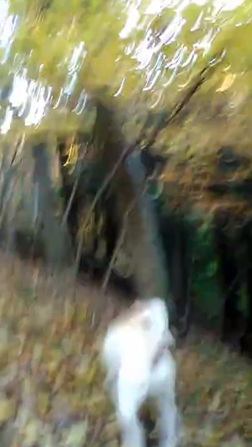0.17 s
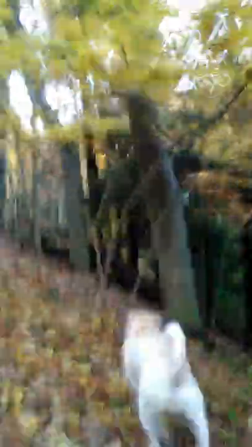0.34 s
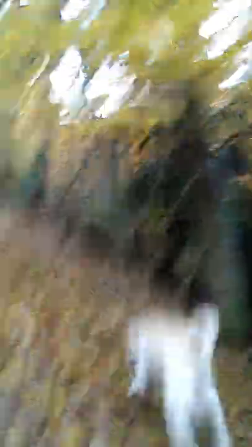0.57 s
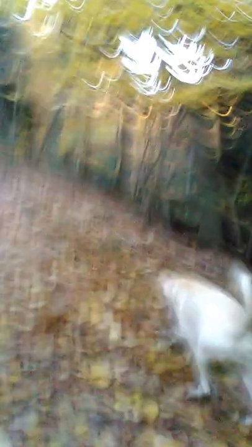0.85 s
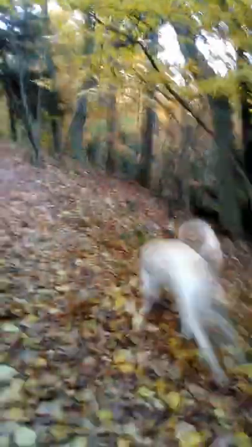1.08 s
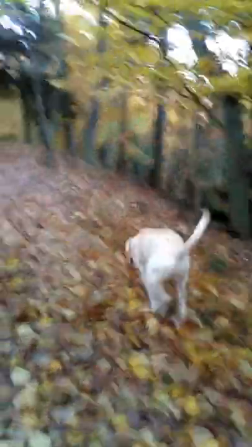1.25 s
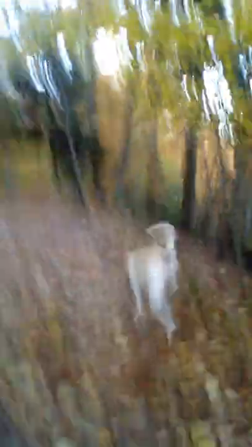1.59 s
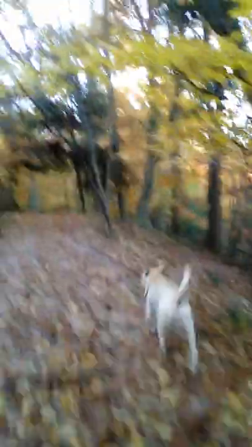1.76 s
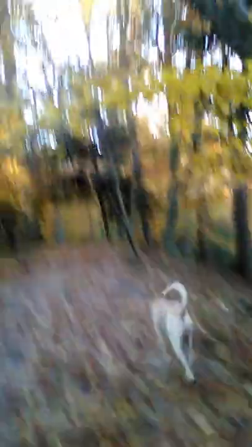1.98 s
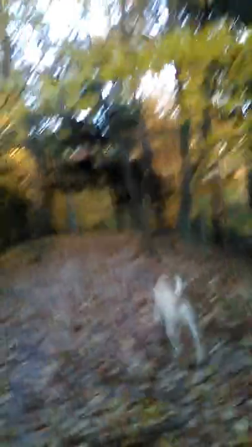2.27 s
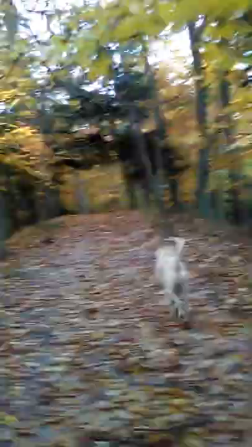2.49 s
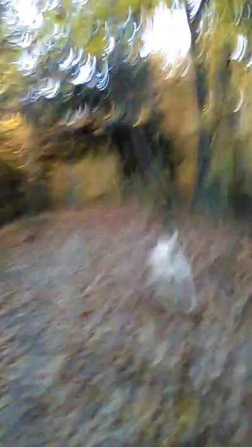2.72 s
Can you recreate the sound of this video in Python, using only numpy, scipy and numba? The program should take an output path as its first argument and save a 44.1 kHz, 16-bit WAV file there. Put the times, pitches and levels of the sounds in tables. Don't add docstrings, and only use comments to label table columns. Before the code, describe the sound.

Walking in dry leaves, crisp crackling steps, a bright twig snap, cloth rustle and handling bumps

```python
import sys
import numpy as np
from scipy import signal
from scipy.fft import rfft, irfft
from scipy.io import wavfile
from scipy.ndimage import uniform_filter1d
from numba import njit

SR = 44100
rng = np.random.default_rng(int(sys.argv[2]) if len(sys.argv) > 2 else 0)


def magnitude_from_level(level_db):
    exponent = np.asarray(level_db, float) / 20
    return 10 ** exponent


def dump_mix(stems):
    frames = np.atleast_2d(stems).T
    limited = np.clip(frames, -1, 1)
    pcm = np.round(limited * 32767).astype(np.int16)
    wavfile.write(sys.argv[1], SR, pcm)


N = 125685


@njit
def svf(x, hz, width):
    y, band_state, low_state = np.empty(len(x)), 0., 0.
    for i in range(len(x)):
        g = np.tan(np.pi * hz[i] / SR)
        damping = width[i] / hz[i]
        v = (band_state + g * (x[i] - low_state)) / (1 + g * (g + damping))
        band_state = 2 * v - band_state
        low_state = low_state + 2 * g * v
        y[i] = damping * v
    return y


def band(x, hz, width):
    return svf(x, np.ones(len(x)) * hz, np.ones(len(x)) * width)


def unit(x):
    return x / np.sqrt(np.mean(x ** 2))


def noise():
    return rng.standard_normal(N)


def walk(rate):
    hold = int(SR / rate)
    steps = np.repeat(rng.standard_normal(N // hold + 1), hold)
    return 1.1 * uniform_filter1d(uniform_filter1d(steps, hold), hold)[:N]


def colour(x, table):
    hz, db = np.array(table).T
    f = np.fft.rfftfreq(N, 1 / SR) + 1
    gain = magnitude_from_level(np.interp(np.log(f), np.log(hz), db, left=-70, right=-70))
    return unit(irfft(rfft(x) * gain, N))


def grains(rate, spread_db):
    hit, size, sign = rng.random(N), rng.exponential(size=N), rng.standard_normal(N)
    return unit((hit < rate / SR) * magnitude_from_level(spread_db * np.minimum(size, 4)) * np.sign(sign))


def swells(t, table):
    power, trait = 1e-14, 0
    for at, db, rise, fall, value in table:
        decay = np.where(t < at, ((at - t) / rise) ** 2, (t - at) / fall * 2)
        p = magnitude_from_level(2 * db) * np.exp(-np.clip(decay, 0, 20))
        power = power + p
        trait = trait + p * value
    return np.sqrt(power), trait / power


def wavelet(t, at, db, hz, length):
    out, near = np.zeros(N), abs(t - at) < 3 * length
    age = t[near] - at
    out[near] = magnitude_from_level(db) * np.exp(-(age / length * 2) ** 2) * np.sin(2 * np.pi * hz * age)
    return out


def ring(t, at, hz, gains, t60):
    age = np.clip(t - at, 0, .05)
    onset = 1 - np.exp(-age / t60 * 20)
    decay = np.exp(-np.log(1000) * age / t60) * (t - at < .05)
    return onset * decay * sum(g * np.sin(2 * np.pi * f * age) for f, g in zip(hz, gains))


# loudest moment in seconds, level in dB, rise in seconds, fall in seconds,
# centre of the crackle in Hz.
STEPS = [(0.0, -59.5, 0.034, 0.16, 4900), (.15, -62.5, 0.019, 0.043, 5440),
         (0.311, -51.5, 0.028, 0.029, 7200), (0.35, -45, 0.013, 0.014, 5200),
         (0.387, -45, 0.013, 0.052, 4850), (.5, -55, 0.037, 0.057, 6560), (0.601, -53.5, 0.072, 0.14, 8960),
         (0.824, -48, 0.07, 0.1, 6600), (0.957, -49, 0.03, 0.12, 7950), (1.18, -62, 0.037, 0.18, 8800),
         (1.357, -58, 0.0085, 0.086, 6500), (1.501, -51.5, 0.044, 0.51, 5750),
         (1.548, -44, 0.012, 0.016, 5350), (1.7, -64, 0.028, 0.16, 7000), (1.842, -41, 0.036, 0.095, 5670),
         (1.993, -44.5, 0.045, 0.12, 7160), (2.133, -43.5, 0.06, 0.087, 4830),
         (2.2, -48, 0.029, 0.011, 6160), (2.32, -57.5, 0.017, 0.36, 8700), (2.503, -50, 0.049, 0.061, 7500),
         (2.598, -48, 0.039, 0.031, 6750), (2.73, -56, 0.062, 0.09, 6600), (2.85, -53.5, 0.067, 0.02, 7750)]
# frequency in Hz, strength in dB per Hz.
LEAF_TONE = [(2000, -47), (3400, -1.5), (3740, -15.5), (3980, -3), (4460, -2.5), (7430, -1.5),
             (11000, -4.5), (13600, -17.5), (14300, -12)]


def leaves(t):
    size, centre = swells(t, STEPS)
    tiny_cracks = grains(4100, 6)
    wash = colour(tiny_cracks + 1.3 * noise(), LEAF_TONE)
    lean = unit(band(band(wash, centre, 2600), centre, 2600))
    patchy = 0
    for hz in 4100 * 1.12 ** np.arange(12):
        flicker = magnitude_from_level(2.4 * (walk(70) + .8 * walk(14)))
        shifted = np.roll(wash, int(hz))
        patchy = patchy + flicker * band(band(shifted, hz, hz / 6), hz, hz / 5)
    return size * magnitude_from_level(2.08 * walk(40.85)) * unit(0.81 * lean + unit(patchy))


# time in seconds, peak level in dB, centre in Hz, length in seconds,
# width as a share of the centre.
LEAF_CRACKS = [(0.092, -54.5, 4620, 0.026, 0.052), (0.122, -49.5, 4520, .006, 0.089),
               (0.151, -41, 6200, 0.0022, 0.35), (.259, -49, 7040, 0.0054, .5),
               (0.279, -49, 4400, 0.011, 0.18), (.3145, -33, 7400, 0.0021, 0.22),
               (0.325, -43, 4320, 0.012, 0.12), (0.772, -37.5, 4450, 0.0026, 0.098),
               (.810, -36.5, 9000, .004, .5), (.904, -38.5, 7900, 0.0048, .4),
               (1.426, -42, 6020, 0.0071, 0.4), (1.454, -43, 4650, .005, 0.097),
               (1.458, -44, 5460, .006, 0.61), (1.512, -44.5, 8200, 0.0034, 0.16),
               (1.517, -33, 4430, 0.0083, .2), (1.605, -37, 6000, 0.0036, 0.72),
               (2.112, -40, 5950, .006, .3), (2.206, -29, 7400, 0.0044, 0.76),
               (2.211, -34.5, 5900, 0.0054, 0.72), (2.22, -38, 4640, 0.0047, 0.25),
               (2.433, -44, 7520, .005, 0.29), (2.49, -41, 6690, 0.0064, 0.48)]


def single_leaves(t):
    spit, out = noise(), np.zeros(N)
    for at, db, hz, length, share in LEAF_CRACKS:
        near = abs(t - at) < .05
        age = t[near] - at
        shape = np.exp(-np.where(age < 0, -age * 8, age * 2) / length)
        pitched = band(band(spit[near], hz, hz * share), hz, hz * share * 2)
        burst = np.minimum(2 * shape, 1) * pitched
        out[near] += magnitude_from_level(db) * burst / abs(burst).max()
    return out


# time in seconds, peak level of the tick in dB, level of the low knock in dB.
TWIG = [
    (.7192, -14, -33),
    (.7200, -19, -38),
    (.7215, -20, -38),
    (.7229, -19, -40),
    (.7244, -31, -44),
    (.7256, -22, -40),
    (.7270, -27, -46),
    (.7304, -40, -36),
]
TICK_HZ, TICK_T60_S = (7200, 5500, 10500), .0028
KNOCK_HZ, KNOCK_T60_S = (1330, 2200, 900), .008


def twig(t):
    out = np.zeros(N)
    for at, tick_db, knock_db in TWIG:
        out += magnitude_from_level(tick_db) * ring(t, at, TICK_HZ, (1.55, .75, .3), TICK_T60_S)
        out += magnitude_from_level(knock_db) * ring(t, at, KNOCK_HZ, (1.3, .9, .4), KNOCK_T60_S)
    return out


def rub(hz, width):
    slips = grains(4000, 3.0) + 0.76 * noise()
    hollow = band(band(band(slips, hz, 2 * width), hz, width), hz, width)
    return unit(hollow) * magnitude_from_level(1.6 * walk(44.81))


# loudest moment in seconds, level in dB,
# rise in seconds, fall in seconds, resonance in Hz.
SLIDES = [(0.172, -60, 0.11, 0.029, 2710), (.31, -55, 0.019, 0.031, 2314),
          (.965, -55.5, 0.0059, 0.077, 2385), (1.6, -54.5, 0.13, 0.17, 2890),
          (1.73, -47, 0.034, 0.14, 2650), (1.836, -38, 0.027, 0.067, 3150),
          (1.899, -43.5, 0.025, 0.013, 2060), (2.17, -45.5, 0.044, 0.25, 2290),
          (2.298, -42, 0.011, 0.028, 2285), (2.45, -55.5, 0.069, 0.27, 2250),
          (2.69, -65, 0.15, 0.021, 2120)]
# loudest moment in seconds, level in dB,
# rise in seconds, fall in seconds, strength of the low hollows in dB.
SCUFFS = [(0.0, -57.5, .05, 0.18, -3), (.3, -64.5, 0.042, 0.51, -1.5), (0.582, -59.5, 0.064, 0.079, -3),
          (.74, -58.5, 0.021, 0.38, -0.5), (.96, -52, 0.0082, 0.079, -3.5), (1.23, -77, 0.021, 0.037, 13),
          (1.357, -58.5, 0.0059, 0.017, -3.5), (1.551, -59, 0.095, 0.72, -5.5),
          (1.903, -45.5, 0.074, 0.11, -5), (2.181, -44, 0.062, 0.1, -13.5), (2.548, -63.5, 0.12, 0.13, -6),
          (2.85, -72, 0.031, 0.018, 12)]


def sleeve(t):
    slide, hz = swells(t, SLIDES)
    scuff, low_db = swells(t, SCUFFS)
    low = 0.87 * rub(1004, 348) + rub(1287, 350)
    high = rub(2250, 480) + 0.96 * rub(3047, 1300) + 0.19 * rub(1660, 500)
    tight_width = 230
    width = tight_width + 1.3 * np.clip(hz - 2330, 0, 900)
    sliding = slide * np.sqrt(tight_width / width) * rub(hz, width)
    return sliding + 0.51 * scuff * (high + magnitude_from_level(low_db) * low)


# time in seconds, peak level in dB, ring in Hz, length in seconds.
FOLDS = [(0.039, -65, 916, 0.019), (0.106, -60, 940, .02), (.169, -53, 930, 0.0095),
         (0.185, -50.5, 1320, 0.01), (0.289, -48.5, 920, 0.021), (0.309, -45.5, 863, 0.012),
         (0.591, -54, 1560, .012), (0.952, -53.5, 928, 0.0096), (1.522, -57, 1340, 0.013),
         (1.548, -57.5, 930, 0.013), (1.61, -54.5, 1180, .01), (1.633, -57.5, 1260, .01),
         (1.72, -46, 2940, .003), (1.733, -53.5, 1270, 0.0089), (1.803, -51.5, 1315, 0.011),
         (1.82, -36.5, 2820, .005), (1.834, -33.5, 3220, .006), (1.858, -50, 1090, .01),
         (1.88, -41.5, 1166, 0.009), (1.9047, -31.5, 2080, 0.0026), (1.9113, -28.5, 2020, 0.0037),
         (1.916, -33.5, 1640, 0.0014), (1.9199, -29, 2010, 0.0032), (1.922, -30, 2500, .002),
         (1.9237, -31, 2830, 0.0017), (1.9252, -32, 2000, .002), (1.928, -38, 1300, 0.0021),
         (1.933, -42.5, 1500, 0.0094), (2.124, -55, 2340, 0.0063), (2.146, -43.5, 2360, 0.0074),
         (2.161, -37, 2280, 0.012), (2.176, -33.5, 2320, 0.0041), (2.193, -39.5, 2386, 0.015),
         (2.209, -40, 3440, .006), (2.214, -37.5, 2370, 0.0055), (2.221, -44, 2140, 0.0068),
         (2.244, -38, 2250, .007), (2.26, -44, 2230, 0.0067), (2.285, -42, 2420, 0.0031),
         (2.295, -35.5, 2290, 0.0043), (2.309, -37, 2260, 0.0043), (2.331, -51.5, 2230, 0.025),
         (2.424, -55, 2310, 0.013), (2.456, -49.5, 2170, 0.01), (2.568, -54, 2216, .02),
         (2.677, -67, 2200, 0.018), (2.705, -72, 2160, .012)]


def folds(t):
    return sum(wavelet(t, *fold) for fold in FOLDS)


# time in seconds, peak level in dB, pitch in
# Hz, length in cycles.
BUMPS = [(.272, -33, 255, 0.89), (.279, -32, 330, 1.2), (0.287, -24, 331, 1.63), (.292, -35.5, 370, 2.2),
         (0.297, -33.5, 367, 2.2), (0.3091, -31.5, 312, 2.44), (0.298, -43, 160.7, 5.3),
         (0.661, -51.5, 350, 0.69), (1.26, -58, 66.6, 1.5), (1.51, -65.5, 60, 1.5),
         (2.128, -54.5, 486, 4.6), (2.13, -68, 61.5, 1.8), (2.45, -72, 63.5, 0.93), (2.681, -41, 212, 1.83)]
# loudest moment in seconds, level in dB, rise in seconds,
# fall in seconds, centre in Hz.
SETTLE = [
    (.3, -49, 0.011, 0.021, 680),
    (.33, -58.5, 0.034, 0.12, 270),
    (2.129, -66, 0.018, 0.064, 480),
    (2.7, -77, 0.011, 0.12, 200),
]


def bumps(t):
    size, hz = swells(t, SETTLE)
    settle = size * unit(band(band(noise(), hz, 460), hz, 460))
    return settle + sum(wavelet(t, at, db, hz, cycles / hz) for at, db, hz, cycles in BUMPS)


# frequency in Hz, strength in dB per Hz.
WOOD_TONE = [(18, -37), (30, -19), (68, -10.5), (125, -10.5), (409, -17), (499, -12.5), (851, -18.5),
             (1600, -15), (3400, -44), (4420, -72), (7480, -120)]
HUM_HZ, WHINE_HZ = 58.7, 13512


def wood():
    far = colour(noise(), WOOD_TONE) * magnitude_from_level(-76 + 3 * walk(12))
    hum = unit(band(noise(), HUM_HZ, 25)) * magnitude_from_level(-77.5 + 1.5 * walk(8))
    wobble = 2.5 * walk(28)
    tone = np.sin(2 * np.pi * WHINE_HZ * np.arange(N) / SR + wobble)
    whine = (1 + 0.25 * walk(30)) * tone * magnitude_from_level(-78)
    halo = magnitude_from_level(-77) * unit(band(band(noise(), WHINE_HZ, 1500), WHINE_HZ, 1500))
    hiss = magnitude_from_level(-71) * unit(band(band(noise(), 9000, 3500), 8800, 4000))
    return far + hum + whine + halo + hiss


def scene():
    t = np.arange(N) / SR
    ground = leaves(t) + single_leaves(t) + twig(t)
    handling = sleeve(t) + folds(t) + bumps(t)
    mono = ground + handling + wood()
    return np.array([mono, mono])


# frequency in Hz, share of the time from 0 to 1.
SPREAD = [(4200, 0.), (5200, .2), (6500, .45), (7500, .85), (10000, .8), (12500, .7), (14200, .4)]


def spread_treble(mid):
    f, at, z = signal.stft(mid, SR, nperseg=2048)
    level = np.sqrt(uniform_filter1d(abs(z) ** 2, size=24, axis=0))
    share = np.interp(f, *np.array(SPREAD).T, left=0, right=0)[:, None]
    blocks = rng.standard_normal((len(f) // 32 + 1, len(at)))
    blocks = uniform_filter1d(uniform_filter1d(blocks, size=2, axis=1), size=4, axis=0)
    rank = blocks.ravel().argsort().argsort().reshape(blocks.shape) / blocks.size
    steady = abs(at - TWIG[0][0]) > .03
    on = (np.repeat(rank, 32, axis=0)[:len(f)] < share) & steady
    random_phase = np.exp(2j * np.pi * rng.random(z.shape))
    return signal.istft(on * level * random_phase, SR, nperseg=2048)[1][:N]


def band_limit(x):
    return signal.sosfilt(signal.butter(12, 15080, fs=SR, output="sos"), x)


# frequency in Hz, width in Hz, depth from 0 to 1.
NOTCHES = [
    (1574, 83, 0.37),
    (3600, 1250, 0.6),
]


def record(dry):
    mid = signal.sosfilt(signal.butter(2, 52, "high", fs=SR, output="sos"), dry[0])
    for hz, width, depth in NOTCHES:
        mid = mid - depth * band(mid, hz, width)
    side = magnitude_from_level(-1.5) * spread_treble(mid)
    top_cut = signal.ellip(10, .2, 60, 14350, fs=SR, output="sos")
    mix = signal.sosfilt(top_cut, np.array([mid + side, mid - side]))
    return band_limit(mix)


dry = scene()
out = record(dry)
dump_mix(out)
```